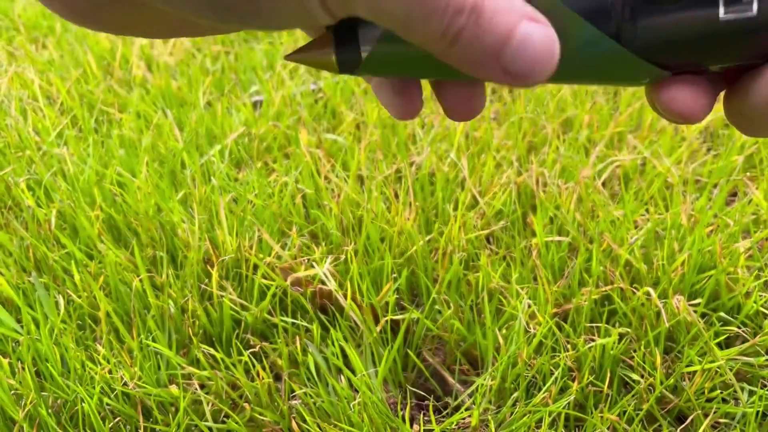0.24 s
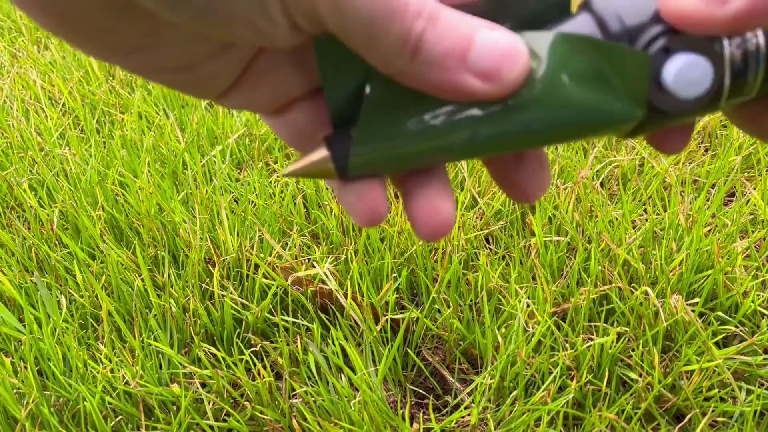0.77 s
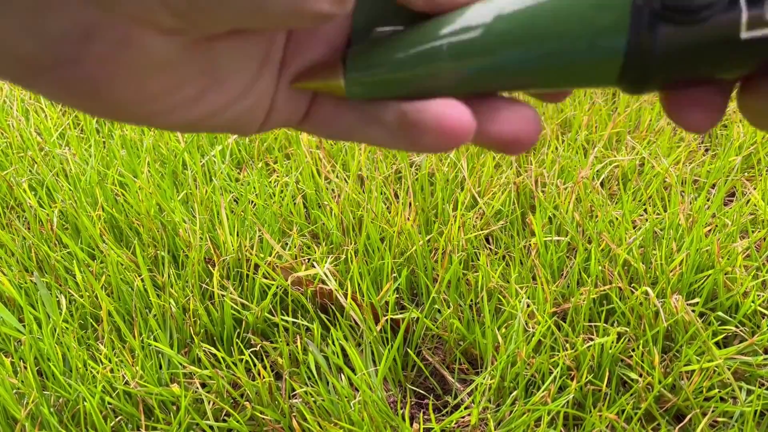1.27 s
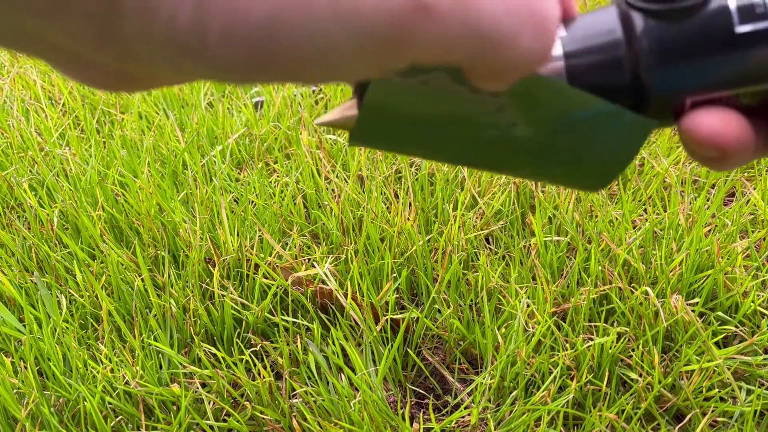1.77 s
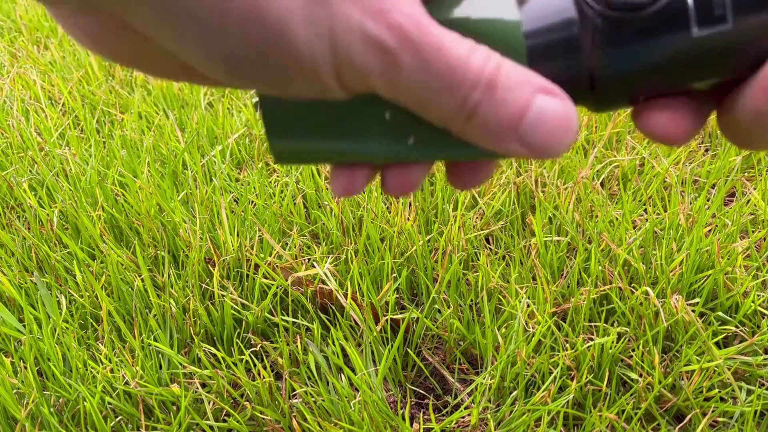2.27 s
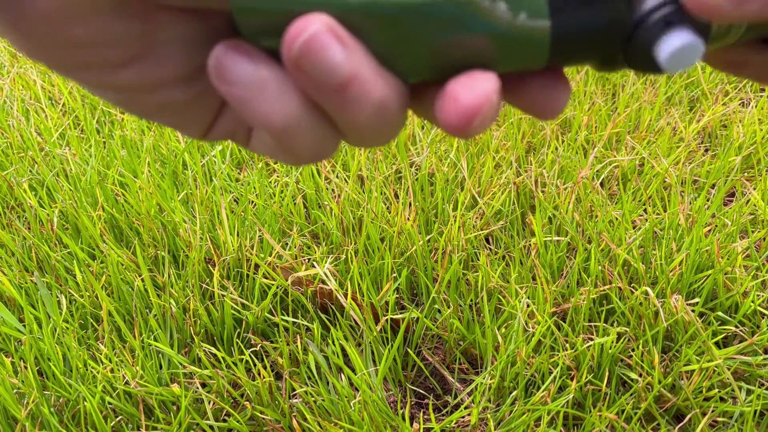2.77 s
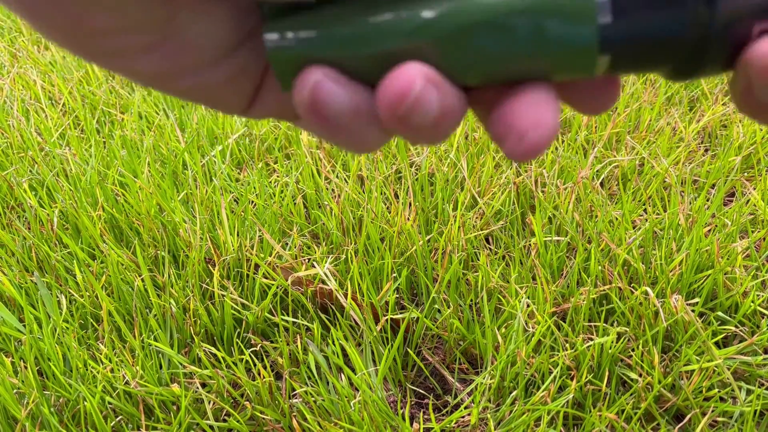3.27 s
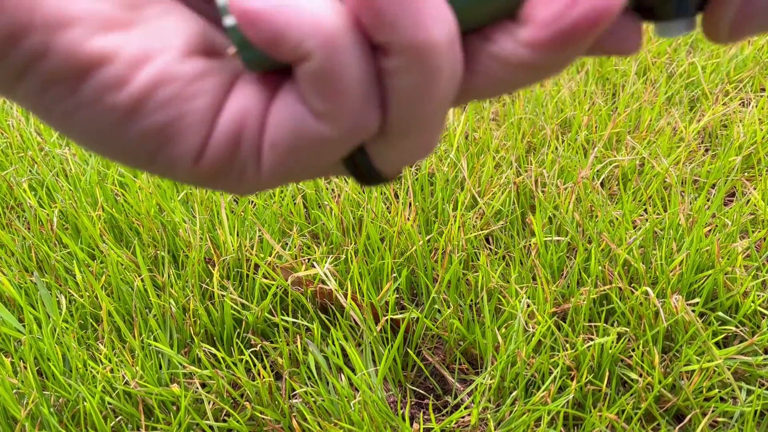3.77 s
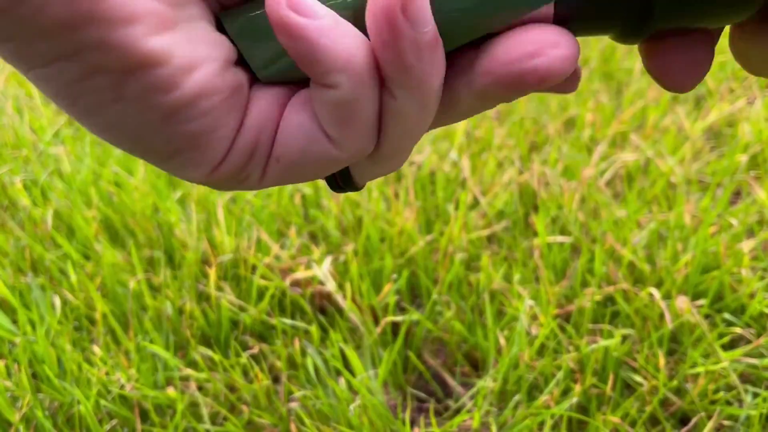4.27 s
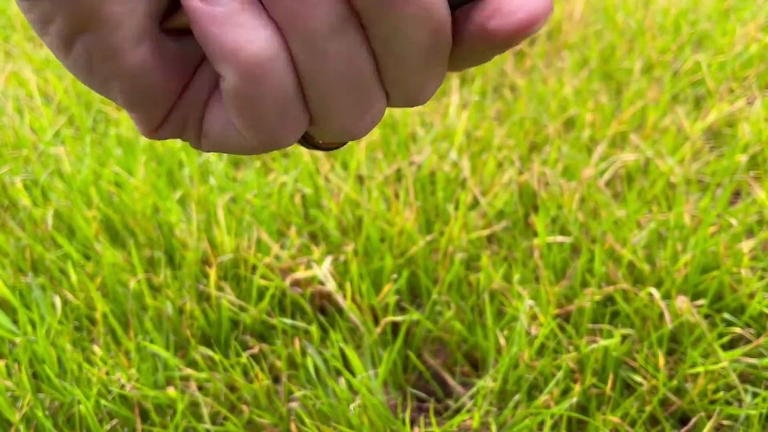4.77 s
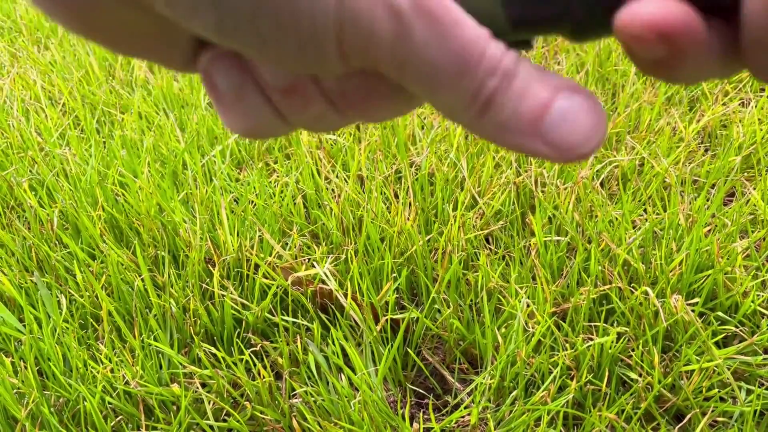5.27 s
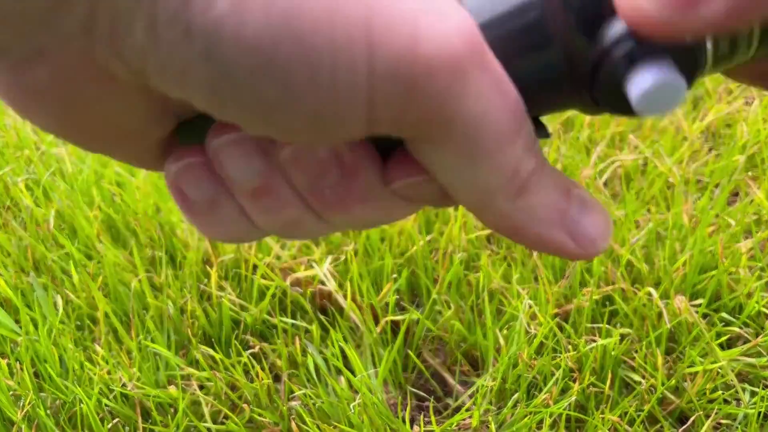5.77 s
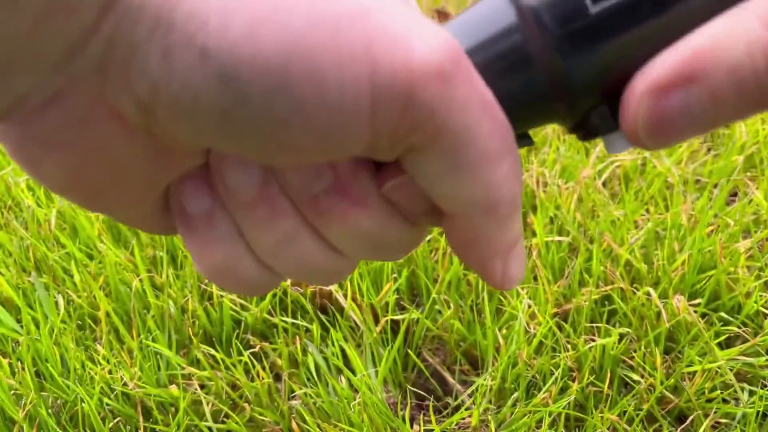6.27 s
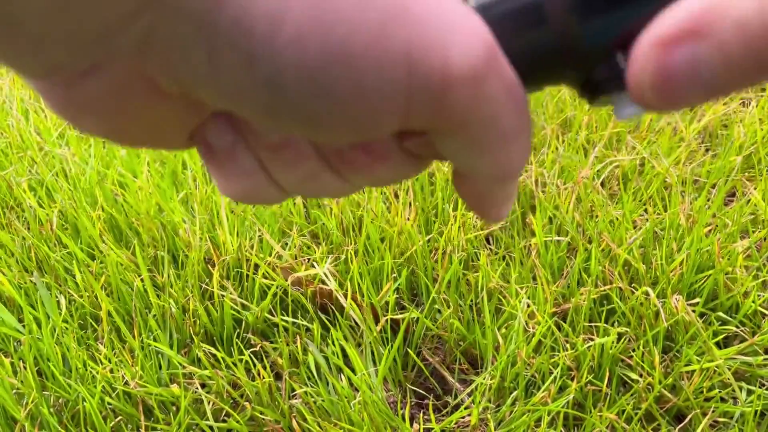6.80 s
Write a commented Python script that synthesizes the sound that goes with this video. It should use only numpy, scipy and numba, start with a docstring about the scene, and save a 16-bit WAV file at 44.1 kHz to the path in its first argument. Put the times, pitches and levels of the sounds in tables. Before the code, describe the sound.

Close, dry abrasive rubbing and sharp sheet pops, first uneven and then steadier, over open air and the growing rumble of a distant vehicle.

```python
"""Outdoors, a hand twists a curled abrasive sheet round the metal tip of a probe, close to the microphones.
The grit hisses with every stroke: a rain of tiny clicks shaking the sheet and the air it encloses.
The stiff backing buckles with dry snaps, each a pop and a spray of slips that make the sheet ring.
A far vehicle comes nearer with rumble, engine note and tyre noise, over the soft noise of open air.
A bird gives one faint falling whistle, a sine tone of sliding pitch."""
import sys
import numpy as np
from scipy import signal
from scipy.fft import rfft, irfft
from scipy.io import wavfile
from numba import njit

SR = 44100
rng = np.random.default_rng(int(sys.argv[2]) if len(sys.argv) > 2 else 0)


def generate_wav(signal):
    """Clip the signal to [-1, 1] and save it as 16-bit WAV at the path in sys.argv[1]."""
    frames = np.transpose(np.atleast_2d(signal))
    scaled = np.clip(frames, -1, 1) * 32767
    pcm = np.round(scaled).astype(np.int16)
    wavfile.write(sys.argv[1], SR, pcm)


N = 310464   # length in samples


def from_db(db):
    """Turns decibels into a plain gain."""
    return 10 ** (np.asarray(db) / 20)


def rms_one(x):
    """Scales a sound to rms 1."""
    return x / np.sqrt(np.mean(x ** 2) + 1e-20)


def in_time(rows):
    """Joins the rows by straight lines: one curve for each column, sample by sample."""
    s, *columns = np.transpose(rows)
    return [np.interp(np.arange(N) / SR, s, column) for column in columns]


def over_hz(points):
    """Reads a table at every frequency of the spectrum, on a log-frequency axis."""
    hz, value = np.transpose(points)
    return np.interp(np.log(np.fft.rfftfreq(N, 1 / SR) + 1), np.log(hz), value)


def coloured(x, spectrum):
    """Filters noise by a table of levels over pitch, then sets it to rms 1."""
    return rms_one(irfft(rfft(x) * from_db(over_hz(spectrum)), N))


def drift(rate_hz, size=8192):
    """Slow random wandering with spread 1, drawn coarsely and joined by straight lines."""
    hz = np.fft.rfftfreq(size, N / SR / size)
    spectrum = rfft(rng.standard_normal(size)) / (1 + (hz / rate_hz) ** 2)
    slow = rms_one(irfft(spectrum, size))
    return np.interp(np.arange(N) * size / N, np.arange(size), slow)


def band(x, low_hz, high_hz, order=2):
    """Keeps only the sound between two pitches."""
    edges_hz = [low_hz, min(high_hz, .45 * SR)]
    return signal.sosfilt(signal.butter(order, edges_hz, "band", fs=SR, output="sos"), x)


def resonate(x, modes):
    """Sends the sound through resonances side by side, with alternating sign."""
    out = 0
    for k, (hz, width_hz, db) in enumerate(modes):
        r = np.exp(-np.pi * width_hz / SR)   # a wider resonance dies away sooner
        gain = (-1) ** k * from_db(db) * (1 - r * r) / 2
        feedback = [1, -2 * r * np.cos(2 * np.pi * hz / SR), r * r]
        out = out + gain * signal.lfilter([1, 0, -1], feedback, x)
    return out


@njit
def moving_resonance(x, cosine, r):
    """A two-pole resonance whose pitch follows a curve."""
    y = np.zeros(len(x))
    for i in range(2, len(x)):
        push = (1 - r * r) / 2 * (x[i] - x[i - 2])
        y[i] = push + 2 * r * cosine[i] * y[i - 1] - r * r * y[i - 2]
    return y


def glide(x, hz, width_hz):
    """Sends both channels through one resonance of gliding pitch."""
    cosine, r = np.cos(2 * np.pi * hz / SR), np.exp(-np.pi * width_hz / SR)
    return np.array([moving_resonance(channel, cosine, r) for channel in x])


def pair(mid, side, likeness):
    """Builds left and right from a part they share and a part with opposite signs."""
    c = np.clip(likeness, -1, 1)
    return np.array([np.sqrt(1 + c) * mid + sign * np.sqrt(1 - c) * side for sign in (1, -1)])


def panned(x, left_db):
    """Makes the left louder than the right by so many dB."""
    return x * from_db([[left_db / 2], [-left_db / 2]])


def widened(x, width):
    """Scales what differs between the two microphones."""
    mid = x.mean(axis=0)
    return mid + width * (x - mid)


LAG_S = 0.00004   # the hollow opens to the left


def lagged(x):
    """The right microphone hears the sound a moment after the left."""
    i = np.arange(x.shape[1])
    return np.array([x[0], np.interp(i - LAG_S * SR, i, x[1])])


# How alike far sounds are at the two microphones: pitch_hz, likeness (0 = unrelated, 1 = the same)
FAR_LIKENESS_BY_PITCH = [(60, .98), (130, .96), (290, 0.9), (450, 0.14), (620, 0), (880, 0.28), (1400, 0),
                         (2500, 0.045), (8000, 0.79)]


def far_noise(spectrum):
    """Noise from afar, whose likeness at the two microphones depends on pitch."""
    mid, side = rfft(rng.standard_normal((2, N)))
    both = irfft(pair(mid, side, over_hz(FAR_LIKENESS_BY_PITCH)), N)
    return coloured(both, spectrum)


# Colour of the open air: pitch_hz, relative level_db (per Hz)
AIR_COLOUR = [(200, 25), (500, 3), (900, 18), (1500, 20), (2300, -6), (3200, 15), (4500, 7), (16000, -49)]
AIR_DB = -63.5


def open_air():
    """Steady diffuse noise of the open field."""
    return from_db(AIR_DB) * far_noise(AIR_COLOUR)


# Colours of the vehicle's exhaust rumble, its roar and the bright hiss of its tyres:
# pitch_hz, relative level_db (per Hz)
RUMBLE_COLOUR = [(20, -30), (32, -23), (45, -10), (60, 1.5), (80, 0.5), (100, 3.5), (125, -3), (160, -2.5),
                 (220, -21), (400, -61)]
ROAR_COLOUR = [(100, -18.5), (160, -8), (210, 0.5), (290, -6.5), (400, -11), (600, -22), (900, -33),
               (2500, -32.5), (5000, -60)]
TYRE_COLOUR = [(250, -40), (450, 5), (680, 2.5), (900, 4), (1150, -5), (1500, -7), (2100, -13), (2900, -53),
               (5000, -54)]
# Firing rate of its engine, before the waver: time_s, pitch_hz
ENGINE_PITCH = [(0, 99.7), (3, 95.8), (5.5, 95.5), (6.65, 99.5), (7.04, 98.2)]
NEAREST_S, DISTANCE_M, SPEED_M_PER_S = 7.04, 11.08, 14.8   # when and how near it passes, and its speed
RUMBLE_DB, ROAR_DB, TYRES_DB, ENGINE_DB = -36, -36, -45, -43.5   # at its nearest, before random sway
# each part fades with this power of the distance
RUMBLE_FALL, ROAR_FALL, TYRES_FALL, ENGINE_FALL = 0.63, 0.9, 1.39, 1.24


def vehicle():
    """Exhaust rumble, a wavering firing note and tyre roar that brightens as it nears on a straight road."""
    along_m = SPEED_M_PER_S * (np.arange(N) / SR - NEAREST_S)
    nearness = DISTANCE_M / np.hypot(DISTANCE_M, along_m)

    firing_hz, = in_time(ENGINE_PITCH)
    wavering_hz = firing_hz * (1 + 0.0154 * drift(3.62))
    note = np.sqrt(2) * np.sin(2 * np.pi * np.cumsum(wavering_hz) / SR)
    engine = from_db(ENGINE_DB + 7.9 * drift(4.4)) * nearness ** ENGINE_FALL * note

    rumble = from_db(RUMBLE_DB) * nearness ** RUMBLE_FALL * far_noise(RUMBLE_COLOUR)
    roar_gain = from_db(ROAR_DB + 1.0 * drift(2.7) + 1.0 * drift(15)) * nearness ** ROAR_FALL
    roar = roar_gain * panned(far_noise(ROAR_COLOUR), left_db=2.0)
    tyres = from_db(TYRES_DB + 2.4 * drift(12)) * nearness ** TYRES_FALL * far_noise(TYRE_COLOUR)
    return engine + rumble + roar + tyres


# The bird's whistle: time_s, pitch_hz, level_db (rms)
WHISTLE = [(.455, 3500, -76), (.472, 3400, -60), (.505, 3100, -63), (.533, 2910, -60), (.556, 2800, -68)]


def bird():
    """One thin falling whistle: a sine tone that follows the table."""
    hz, level_db = in_time(WHISTLE)
    t = np.arange(N) / SR
    sings = (t > WHISTLE[0][0]) & (t < WHISTLE[-1][0])
    return sings * from_db(level_db) * np.sqrt(2) * np.sin(2 * np.pi * np.cumsum(hz) / SR)


# The hand takes hold: start_s, level_db (before the rise and decay), pitch_hz
HAND_BUMPS = [(0.114, -37, 480), (0.186, -34, 330), (.19, -39, 626), (0.222, -25.5, 308), (.224, -30, 566),
              (.253, -38, 576), (.754, -41, 410), (1.061, -30, 563), (4.692, -36, 510)]


def bumps(ring_s, size=2600):
    """Soft contacts of hand and probe: a low note that the flesh damps at once."""
    out, t = np.zeros(N + size), np.arange(size) / SR
    envelope = (1 - np.exp(-t / 0.00039)) * np.exp(-t / ring_s)
    for s, db, hz in HAND_BUMPS:
        at = int(s * SR)
        out[at:at + size] += from_db(db) * np.sin(2 * np.pi * hz * t) * envelope
    return out[:N]


# Strokes of the hand: start_s, length_s, hiss_db (grit), swell_db (rise from start to end),
# arch (sharpness, no unit), hollow_db, fine_db (fine grit), sheen_db (these three relative to the hiss),
# hollow_hz (base pitch of the hollow at mid-stroke)
HAND_STROKES = [(-0.044, 0.15, -65, 1, 1.3, 2.5, -0.5, -5.6, 2000),
                (0.072, 0.23, -59, 13.4, 0.42, 1.5, -5, -10, 2000),
                (0.296, 0.11, -44.5, -14, 3, -3, -7, -1, 2120),
                (0.363, 0.42, -59, 44, 0.77, 2, -2.5, -8, 2300),
                (0.734, 0.15, -45, -9, 0.72, -4, -5, -13, 2050),
                (0.88, 0.17, -54, -26, 1.25, -4.5, -4, -15, 2200),
                (0.967, 0.15, -45, 37, 1.8, -5.1, -10, -14, 2080),
                (1.08, 0.18, -50, 10, 0.75, -11.5, -6.5, -17, 2050),
                (1.224, 0.15, -54.5, -16, 1.8, -3, 2.5, -5, 2080),
                (1.291, 0.306, -68, -10.1, 0.41, -11, -7, -14, 2080),
                (1.498, 0.24, -46, 0, 3.1, 1, -2, -7.9, 2170),
                (1.663, 0.24, -54.3, -8, 3.1, 2, -4, -16, 2440),
                (1.945, 0.25, -66.5, -10.5, 0.21, 6.5, -3, -8, 2080),
                (2.08, 0.48, -54.5, 12.6, 0.47, 2, -5, -8, 2180),
                (2.557, 0.43, -50.5, -5, 0.42, -0.8, -5.6, -9, 2170),
                (3.013, 0.43, -49.5, 7.5, 1.1, 3.5, -5.5, -6.5, 2090),
                (3.418, 0.3, -46.5, -9, 1.64, 0.5, -4, -5, 2180),
                (3.583, 0.4, -51.5, -9.5, 0.99, 0, -4.5, -9, 2140),
                (3.977, 0.307, -51.5, 36, 0.96, 1.2, -5, -15, 2340),
                (4.27, 0.15, -55, -4, 0.85, 0.9, -6, -19, 2000),
                (4.409, 0.2, -46.5, -8, 0.89, -1, -8.5, -10, 2060),
                (4.551, 0.31, -49.5, -12, 1.2, 2, -5.5, -12, 2050),
                (4.798, 0.34, -48.5, 5.1, 0.43, -4, -5.5, -14, 2200),
                (5.095, 0.32, -49.3, -14, 0.59, -2.6, -6, -14, 2150),
                (5.371, 0.41, -45, -3.5, 1.76, -6, -6, -8, 2200),
                (5.753, 0.36, -46.0, -20, 1.03, -7, -9, -9.5, 2200),
                (6.175, 0.32, -53.5, -57, 2, -9, -8, -12, 2220),
                (6.379, 0.38, -46, 7, 2.25, -11, -8.5, -16, 2200),
                (6.712, 0.296, -48, -21, 2.54, -10, -7, -12, 2200)]
REST_DB = (-79, -80, -84, -90)   # the sheet creeps in the hand between strokes: hiss, hollow, fine, sheen
REST_SWAY_DB = 4


def stroke_levels():
    """Gains of hiss, hollow, fine grit and sheen: each stroke gathers speed, arches and fades into the turn."""
    t = np.arange(N) / SR
    power = from_db(np.array(REST_DB)[:, None] + REST_SWAY_DB * drift(5.6)) ** 2
    for start, length, hiss_db, swell_db, arch, hollow_db, fine_db, sheen_db, _ in HAND_STROKES:
        on = (t > start) & (t < start + length)
        progress = (t[on] - start) / length
        shape = np.abs(np.sin(np.pi * progress)) ** arch
        gain = shape * from_db(hiss_db + swell_db * (progress - .5))
        power[:, on] += (gain * from_db([[0], [hollow_db], [fine_db], [sheen_db]])) ** 2
    return np.sqrt(power)


def hollow_pitch():
    """Each new grip retunes the hollow; its base pitch glides from mid-stroke to mid-stroke."""
    return in_time(sorted((start + length / 2, hz) for start, length, *_, hz in HAND_STROKES))[0]


# Colour of the faint snaps, added to their strength: ring_db, knock_db, crack_db, treble_db
CRINKLE_COLOUR = (-6.5, -6.5, -22, -17)
CRINKLES_PER_S, CRINKLE_ABOVE_DB, CRINKLE_SPREAD_DB = 7.5, -2, 1   # strength is relative to the hiss
CRINKLE_SLIP_S, CRINKLE_RING_HZ, CRINKLE_KNOCK_HZ, CRINKLE_CRACK_HZ = 0.0016, 2100, 960, 3800
WRAPPED_S = 5.3   # they stop once the sheet lies tight round the probe


def crinkles(hiss_gain, count=100):
    """Faint snaps at random moments while the sheet is loose, their strength following the stroke's hiss."""
    times = .05 + np.cumsum(rng.exponential(1, count)) / CRINKLES_PER_S
    above_db = CRINKLE_ABOVE_DB + CRINKLE_SPREAD_DB * rng.standard_normal(count)
    snaps = []
    for s, db in zip(times, above_db):
        if s < min(WRAPPED_S, N / SR):
            levels_db = 20 * np.log10(hiss_gain[int(s * SR)]) + db + np.array(CRINKLE_COLOUR)
            snaps.append((s, CRINKLE_SLIP_S, *levels_db,
                          CRINKLE_RING_HZ, CRINKLE_KNOCK_HZ, CRINKLE_CRACK_HZ))
    return snaps


# The backing buckles: start_s, slip_s (decay of the slips, at least 0.0003 s), ring_db (hollow ring),
# knock_db, crack_db, treble_db, ring_hz (base pitch of three resonances), knock_hz, crack_hz
BACKING_SNAPS = [(.1322,0.024,-47.5,-51.5,-52.5,-49,1930,870,4930),(.2039,0.0036,-55,-48,-63,-72,1930,800,3600),
                 (.3242,0.0087,-56,-55,-49,-42,2160,1100,5030),(.2222,0.01,-42.5,-38.5,-41,-73,1900,800,3550),
                 (.241,.001,-49,-44.5,-58,-65,1990,850,3500),(.2542,0.0047,-40,-48,-46,-65,2060,840,3420),(.3422,.0032,-41.5,-43,-31,-39,2230,1100,3600),
                 (.3859,0.0056,-45.5,-47,-44,-62,1870,1100,3700),(.7485,0.001,-49,-43,-41.5,-39,2100,1340,4070),
                 (.7536,0.0014,-29.5,-35,-31,-44,2020,1280,4100),(.789,0.00071,-39.5,-46.5,-45,-57,2100,990,3770),
                 (.924,0.00085,-30.5,-38.5,-35.5,-40,2300,1470,3800),(1.0617,0.0011,-41,-42,-36,-53,1950,616,3680),
                 (1.0655,0.0012,-38,-57,-30,-44,1920,860,3800),(1.652,0.0012,-40,-43.5,-41.5,-48,2090,860,3320),
                 (1.827,0.0035,-48,-47.5,-57,-75,2180,1050,3900),(2.0687,0.0028,-52,-52.5,-59,-62,2100,1000,3800),
                 (2.1235,0.0026,-45,-52,-66,-72,1820,900,3500),(2.1335,0.001,-21,-29.5,-38.5,-46.5,2124,725,3550),(2.2053,0.0055,-36.5,-53,-44,-52,2010,990,5040),
                 (2.3236,.0015,-42.5,-54,-65,-65,2100,900,3500),(2.3405,0.00098,-33.5,-46,-55,-65,2100,770,3380),
                 (2.386,0.0046,-41,-57,-54,-57,2100,990,3200),(2.392,0.0059,-28,-38,-44.5,-48,2170,950,3200),(2.4387,0.0027,-33,-42,-45,-67,2100,610,3820),
                 (2.491,0.0092,-35,-45.5,-39,-52,2226,1220,3500),(2.552,0.0018,-23,-38.5,-28.5,-30.5,2120,1300,6440),
                 (2.5902,.0038,-46,-54,-45,-48,2040,1000,4660),(2.6239,0.0011,-18.5,-41,-28,-32,2049,1240,4900),
                 (2.6978,0.0023,-28,-32,-40.5,-46,1950,1200,3420),(3.1163,.001,-46.5,-63,-68,-72,2160,1100,3500),
                 (3.1399,0.00091,-35.5,-43,-58,-67,2230,990,3240),(3.174,0.0011,-42,-45,-67,-51,2190,1150,3920),
                 (3.2705,0.0024,-42,-68,-70,-72,1900,1100,3600),(3.4504,0.00085,-52,-54,-51,-51,2100,700,4270),
                 (3.4838,0.00069,-55,-37,-48,-58,2200,1090,4090),(4.0528,0.0018,-34.5,-46.5,-65,-70,2220,1230,3640),
                 (4.165,.0011,-27.5,-35,-24.5,-31.5,1870,1230,3700),(4.1952,0.0026,-34,-41.5,-37,-40,2100,790,4710),
                 (4.2052,0.0012,-28,-43,-25,-30.5,2260,1310,4240),(4.3315,0.0013,-32,-65,-46,-52,1950,1170,4800),
                 (4.3858,0.00062,-23,-45,-27.5,-34.5,1950,1260,3240),(4.442,0.00079,-30,-41,-28,-48,1900,1050,3800),
                 (4.5107,0.00097,-35.5,-48,-28.5,-35.5,1940,1200,3200),(4.65,.016,-37,-56,-35.5,-36.5,1980,750,4430),
                 (4.6683,.00085,-37,-40,-40,-39,2040,755,5200),(4.6917,0.0015,-29.5,-38,-38,-23.5,2010,980,6900),
                 (4.7146,0.00088,-35.5,-35,-30,-22.5,1862,1070,4570),(4.7403,0.0094,-40,-43,-43,-57,2070,1070,3160),
                 (4.7818,0.00039,-41,-52,-51,-66,1920,1170,3280),(5.1138,0.0016,-53,-61,-49,-48,1960,1200,4500),
                 (5.1306,0.0012,-27,-46.5,-28,-35.5,1940,1240,4760),(6.6375,0.0014,-38.5,-39.5,-24,-33,2010,920,5000),
                 (6.6387,0.00035,-52,-64,-23.5,-33,1950,700,5100),(7.0023,0.00044,-49,-47,-44,-87,2100,1100,3600)]


def buckling(snaps, size=1400, lead_size=180):
    """Each snap is a quick rise, one sharp pop and a spray of slips, heard through the sheet's resonances."""
    out = np.zeros((2, N + size))
    t = (np.arange(size) - lead_size) / SR
    pop = np.arange(size) == lead_size + 14
    rise = from_db(-9) * np.exp(-np.abs(t) / 0.0012)
    for s, slip_s, ring_db, knock_db, crack_db, treble_db, ring_hz, knock_hz, crack_hz in snaps:
        spray = np.exp(-np.abs(t) / max(slip_s, .0003)) + from_db(-25) * np.exp(-np.abs(t) / .005)
        slips = rng.standard_normal((2, size)) * np.where(t < 0, rise, spray)
        # the pop moves the whole sheet; the slips make most of the treble
        push = pair(slips[0] + 4.1 * pop, slips[1] + 1.5 * np.roll(pop, shift=5), likeness=0.46)
        scratch = pair(slips[0] + 0.87 * pop, slips[1], likeness=0.65)

        knock = lagged(band(resonate(push, [(knock_hz, 420, 0)]), 230, 2200))
        ring_modes = [(ring_hz * 0.873, 230, -1), (ring_hz * 0.997, 360, 0), (ring_hz * 1.376, 600, -9)]
        ring = lagged(band(resonate(push, ring_modes), 1410, 5930, order=3))
        crack = band(resonate(scratch, [(crack_hz, 2800, 0)]), crack_hz * 0.58, 6650, order=3)
        # the brighter the snap, the higher its treble lies
        treble_hz = np.clip(10284 + 260 * (treble_db - crack_db), 8000, 12000)
        treble = band(resonate(scratch, [(treble_hz, 3800, 0)]), 7700, 15700, order=3)
        treble = widened(treble, width=0.55)

        at = int(s * SR) - lead_size
        parts = [(knock, knock_db, 2.8), (ring, ring_db, 2.6), (crack, crack_db, 3.0), (treble, treble_db, .3)]
        for sound, level_db, left_db in parts:
            # levels are rms over a hundredth of a second, before panning
            rms = np.sqrt((sound ** 2).sum(axis=1, keepdims=True) / (SR / 100))
            out[:, at:at + size] += panned(sound / rms, left_db) * from_db(level_db)
    return out[:, :N]


def grit(per_s, spread_db):
    """Grains catch on the metal and let go: a rain of uneven clicks."""
    sizes = from_db(spread_db * np.minimum(rng.exponential(1, N), 5))
    return sizes * rng.standard_normal(N) * (rng.random(N) < per_s / SR)


def flexing(x, width_share, swing_db, bend, count=20):
    """Bending modes of the sheet slide in pitch, swell and fade as the fingers press on different spots."""
    out, stiffness = 0, drift(0.43)
    for k, hz in enumerate(np.geomspace(2800, 15000, count)):
        gain = from_db(swing_db * np.clip(drift(21.0), -1.6, 1.6))
        pitch_hz = hz * np.exp(bend * (stiffness + 0.68 * drift(3.15)))
        out = out + (-1) ** k * gain * glide(x, pitch_hz, width_share * hz)
    return rms_one(out)


# Colours of the grit on metal, the fine grit and the sheen of the finest grit:
# pitch_hz, relative level_db (per Hz)
HISS_COLOUR = [(300, -20), (600, -0.5), (1150, -8), (1500, -24), (2300, -21), (2950, 6.5), (3500, 5.5),
               (4550, 9), (5400, 5.5), (6500, 6.5), (7700, 8), (8400, -15), (16000, -9.5)]
FINE_COLOUR = [(7000, -36), (8400, -10.5), (9000, 12.5), (10500, 7), (11700, 3), (13000, -8), (16500, -35)]
SHEEN_COLOUR = [(10000, -23), (11700, -8.5), (13000, 3.5), (15300, 3), (16500, -34)]
# Air in the curled sheet: multiple (of the hollow's base pitch), width_hz, relative level_db,
# stereo_width (no unit)
SHEET_AIR = [(.94, 291.6, 2, 0.53), (1.12, 408, -0.5, 1.12)]
# Air in the cupped hand: pitch_hz, width_hz, relative level_db
PALM_AIR = [(1785, 200, 0), (1150, 270, -9)]


def rubbing(hiss_gain, hollow_gain, fine_gain, sheen_gain):
    """Fine and coarse grains excite the sheet, the cupped hand and the hollow; the hand judders as it slides."""
    hollow_hz = hollow_pitch()
    grains = pair(grit(per_s=20000, spread_db=0.0), grit(per_s=22500, spread_db=3.16), likeness=0.83)
    grains = rms_one(grains)
    coarse = 3.2 * grit(per_s=90, spread_db=1.0)

    # below its bending modes the sheet passes the grit on plainly
    bending = flexing(grains + coarse, width_share=.055, swing_db=1.9, bend=.04)
    sheet = bending + .8 * band(grains, 250, 2500)
    hiss = panned(coloured(sheet, HISS_COLOUR), left_db=2.0)
    fine_and_sheen = fine_gain * coloured(sheet, FINE_COLOUR) + sheen_gain * coloured(sheet, SHEEN_COLOUR)
    fine_and_sheen = widened(fine_and_sheen, width=0.76)

    hollow = 0
    for k, (multiple, width_hz, db, stereo_width) in enumerate(SHEET_AIR):
        tone = glide(grains + 0.97 * coarse, multiple * hollow_hz, width_hz)
        hollow = hollow + (-1) ** k * from_db(db) * widened(tone, stereo_width)
    palm = sum(resonate(grains + coarse, [mode]) for mode in PALM_AIR)
    hollow = rms_one(band(hollow - palm, 470, 2580, order=3))
    hollow = panned(lagged(hollow), left_db=1.5)

    judder_db = 1.9 * drift(13)
    hollow_flicker_db, fine_flicker_db = 0.72 * drift(63), 1.03 * drift(29)
    return from_db(judder_db) * (hiss_gain * hiss
                                 + hollow_gain * from_db(hollow_flicker_db) * hollow
                                 + from_db(fine_flicker_db) * fine_and_sheen)


def scene():
    """Close, dry handling over the sounds of the open field."""
    field = vehicle() + bird() + open_air()
    hiss_gain, hollow_gain, fine_gain, sheen_gain = stroke_levels()
    strokes = rubbing(hiss_gain, hollow_gain, fine_gain, sheen_gain)
    snaps = buckling(BACKING_SNAPS + crinkles(hiss_gain))
    return field + strokes + snaps + bumps(ring_s=0.0032)


CUTOFF_HZ = 16000


def record(dry):
    """Cuts the top of the sound steeply."""
    return signal.sosfilt(signal.ellip(10, .2, 80, CUTOFF_HZ, fs=SR, output="sos"), dry)


dry = scene()
out = record(dry)
generate_wav(out)
```